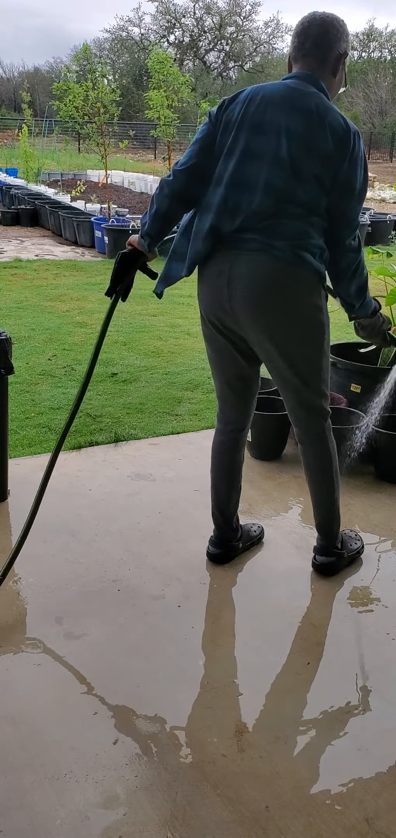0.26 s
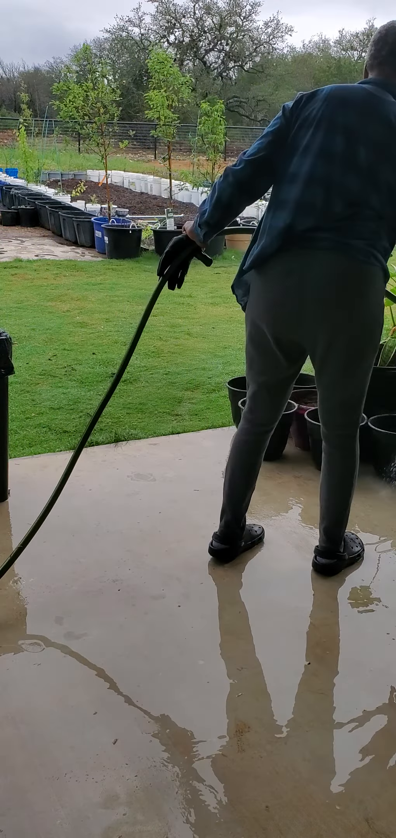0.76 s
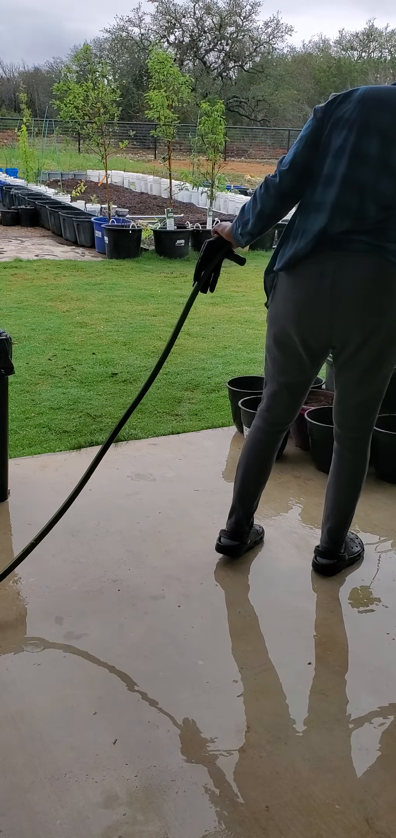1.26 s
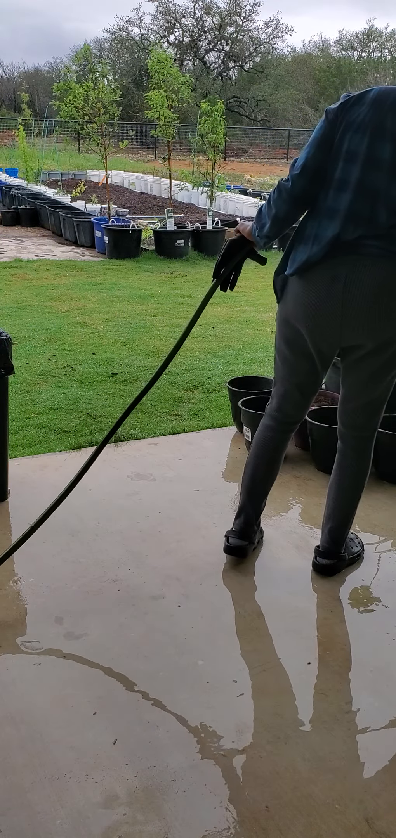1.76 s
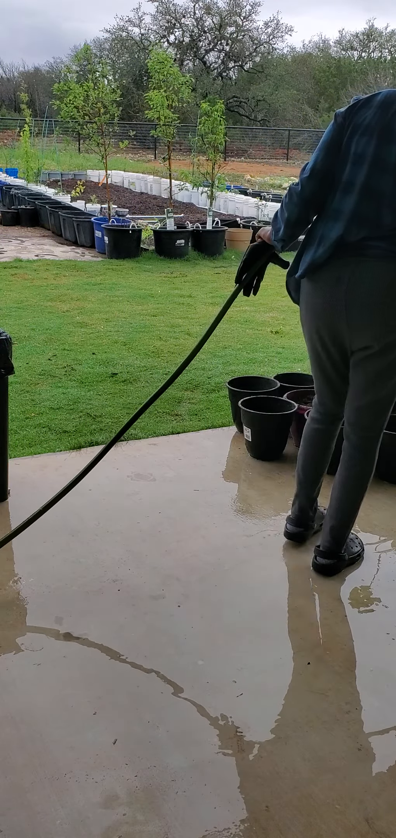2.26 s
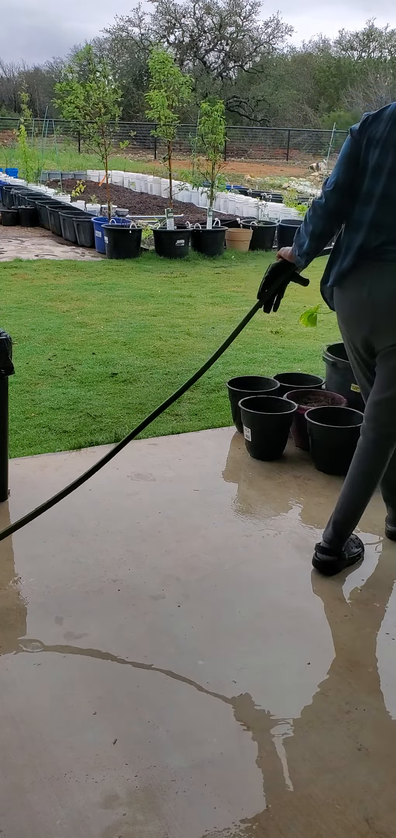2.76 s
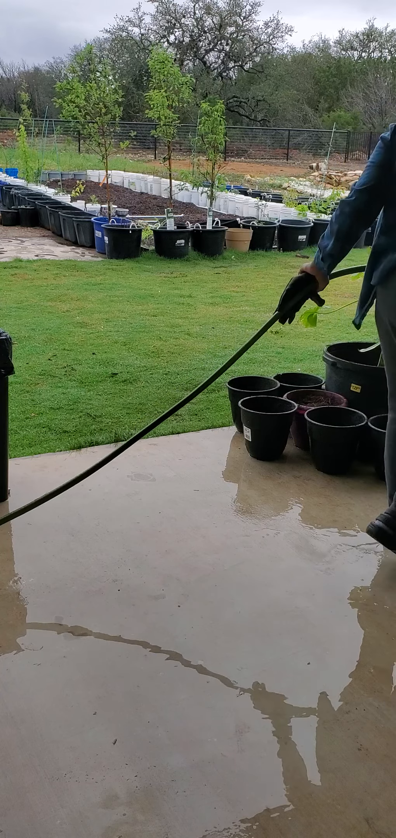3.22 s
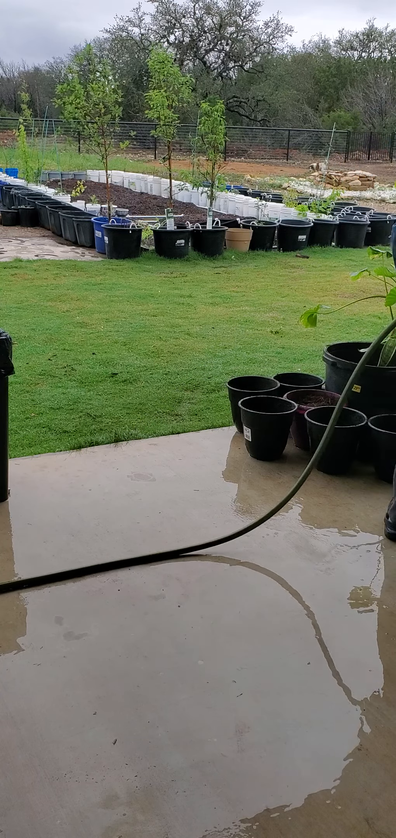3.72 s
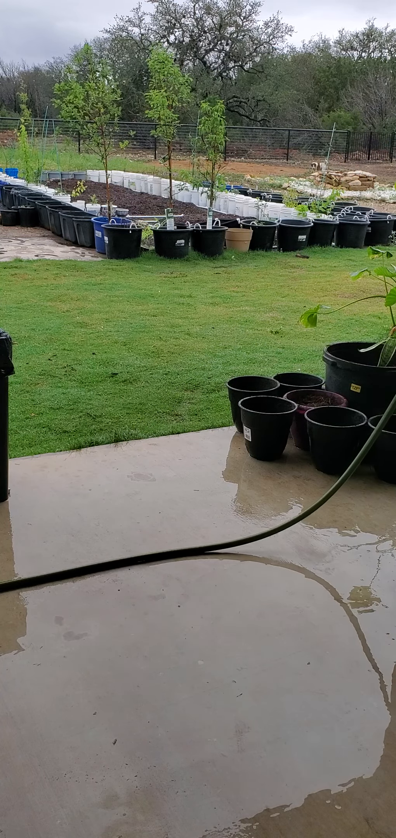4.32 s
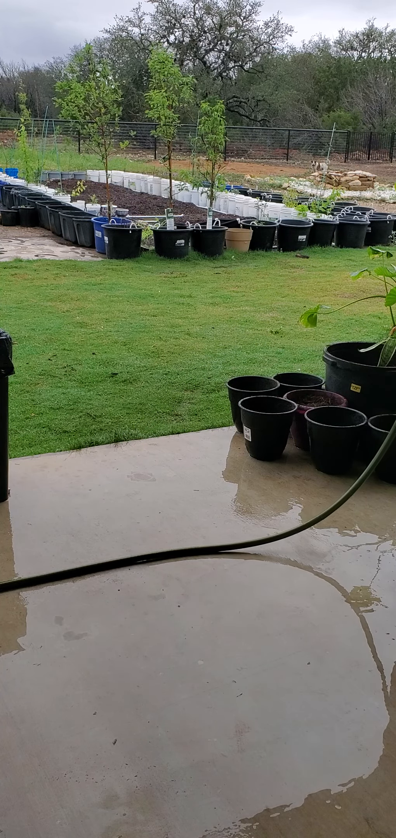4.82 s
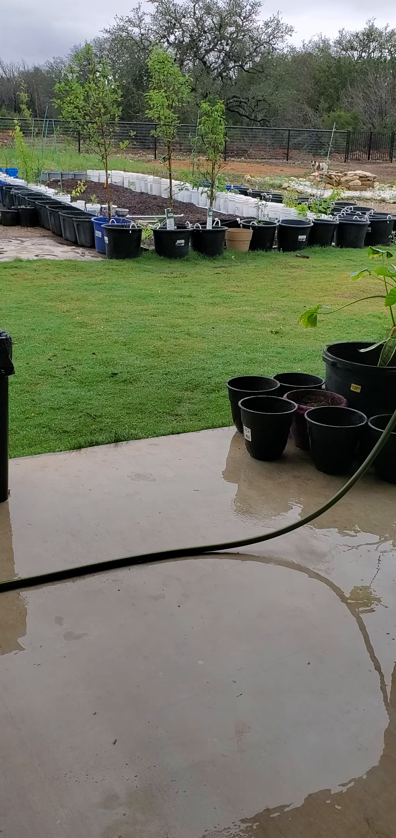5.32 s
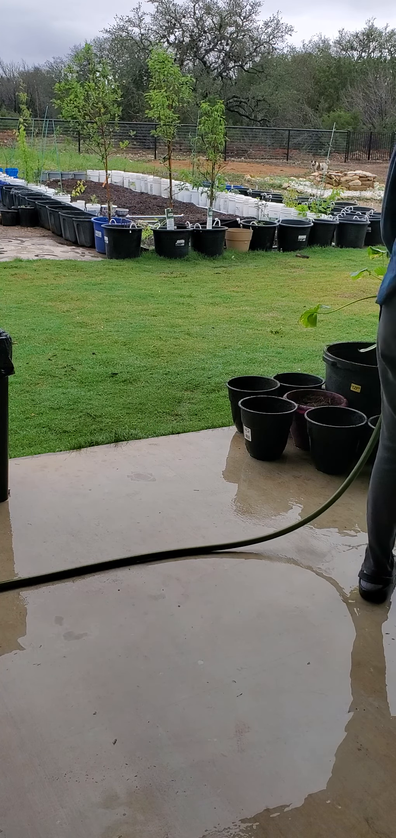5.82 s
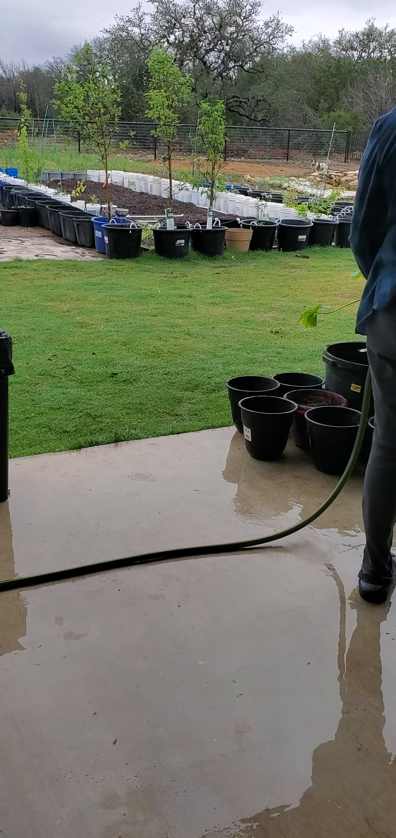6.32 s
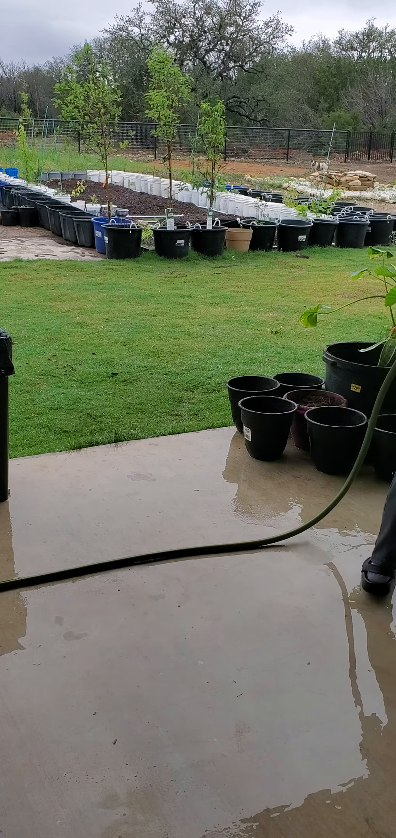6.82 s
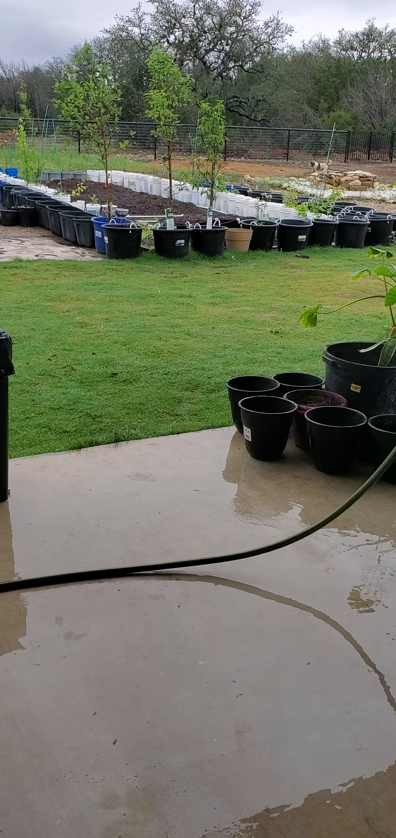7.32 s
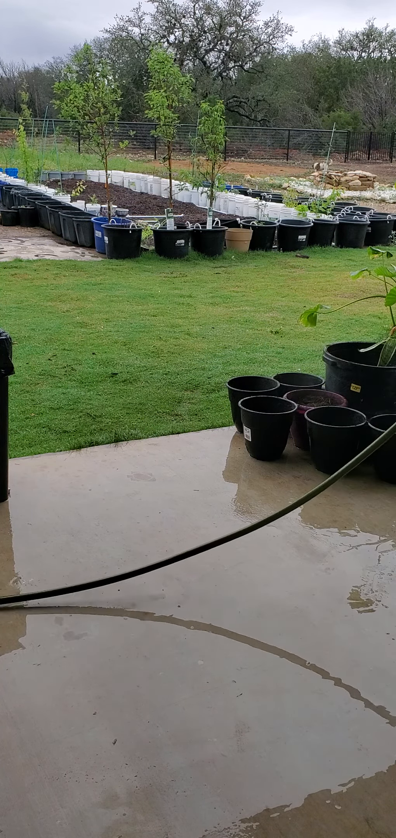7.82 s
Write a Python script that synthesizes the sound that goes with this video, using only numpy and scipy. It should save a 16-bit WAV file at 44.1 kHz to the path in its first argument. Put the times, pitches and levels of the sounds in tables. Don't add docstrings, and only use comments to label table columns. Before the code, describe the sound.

Outdoors on a wet concrete patio, a garden hose sprays close by with a bright, dense fizz and splashing. It patters across plastic pots, with brief hollow notes and clicking drops. Hard wet smacks land just before the middle, then the spray drops away to thin spits, a soft knock and gentle bursts on pots. Faint distant road rumble throughout; stereo phone microphone nearby.

```python
import sys
import numpy as np
from scipy import signal
from scipy.fft import rfft, irfft, next_fast_len
from scipy.io import wavfile
from scipy.ndimage import uniform_filter1d

SR = 44100
rng = np.random.default_rng(int(sys.argv[2]) if len(sys.argv) > 2 else 0)


def generate_wav(signal):
    frames = np.transpose(np.atleast_2d(signal))
    scaled = np.clip(frames, -1, 1) * 32767
    pcm = np.round(scaled).astype(np.int16)
    wavfile.write(sys.argv[1], SR, pcm)


def volts(x):
    e = np.asarray(x, float) / 20
    return 10 ** e


N = 355887
STEP = 44

# [t/s, fizz level on the slab/dB, splash level in pooled water/dB]
SPRAY = [(0, -33.5, -44), (.95, -32.5, -41.5), (1.35, -33, -42), (2.0, -36, -41.5), (2.45, -34.5, -43.5),
         (2.95, -32.5, -40), (3.25, -37, -42.5), (4.0, -39, -42.5), (4.22, -39, -46.5),
         (4.76, -41.5, -44.5), (5.02, -60.5, -53), (5.2, -64, -55.5), (5.6, -61, -58), (6.13, -52.5, -54.5),
         (6.42, -71, -58), (7.0, -61.5, -50.5), (7.7, -47, -49), (8.07, -57, -51)]
# [f/Hz, level per Hz/dB]
FIZZ_SPECTRUM = [(2500, -25), (5000, -9), (7000, 1), (9000, -4), (12000, 2.5), (15000, 3.5), (17000, 0)]
SPLASH_SPECTRUM = [(800, -33), (2000, -13.5), (3300, -3.5), (4500, -1.5), (6500, -1), (8500, -7.5),
                   (13000, -14)]
WALL_SPECTRUM = [(400, -13.5), (800, -10), (1300, -2), (1800, -2), (2500, -2), (3200, -4.5), (4500, -10.5),
                 (9000, -22)]
# [f/Hz, width/Hz, level/dB]
HOLLOW_MODES = [(260, 85, -14.5), (342, 55, -6.5), (470, 94, -2.5), (610, 90, -6), (875, 160, -17.5)]
# [arrival t/s, stay/s, change of fizz level/dB]
SHADES = [(.15, 0.16, -5.5), (.6, 0.068, -5), (1.05, 0.076, -9), (1.64, 0.039, -6), (2.2, 0.12, -6),
          (2.62, .1, -6), (4.4, 0.27, 3), (6.72, 0.12, 15), (7.55, .04, -7)]
# [arrival t/s, stay/s, level/dB]
SPITS = [(5.27, .01, -63), (5.38, .03, -55), (5.63, .01, -62), (5.7, .03, -56), (5.87, .02, -58),
         (5.97, .02, -57), (6.04, .03, -49), (6.2, 0.032, -53), (6.33, .01, -78), (7.46, .03, -50),
         (7.67, .04, -46.5), (7.79, 0.018, -57)]
# [arrival t/s, stay/s, level/dB]
PUDDLE = [(.11, 0.01, -35), (1.19, 0.063, -47), (.29, 0.05, -37), (1.7, 0.054, -39.5), (2.57, .2, -38.5),
          (2.81, 0.0075, -54), (3.47, 0.016, -39), (4.1, 0.058, -42.5), (4.42, 0.011, -46.5),
          (5.39, .02, -58), (5.62, 0.018, -60), (6.7, 0.14, -40.5)]
# [arrival t/s, stay/s, wall level/dB, hollow level over wall/dB]
POTS = [(.15, 0.03, -45, -27), (.26, 0.056, -43, -10), (.61, .06, -50, -12), (1.02, 0.17, -44, -10),
        (1.649, 0.05, -40.5, -13), (2.0, 0.029, -48, -26), (2.2, .18, -41, -12), (2.63, 0.067, -41, -15),
        (3.71, .11, -39, -5), (4.16, .02, -54, -12), (5.52, .02, -58.5, -4), (5.96, 0.1, -54.5, -9),
        (6.69, 0.23, -41, -6), (7.1, 0.27, -42.5, -10), (7.42, 0.22, -44, -12), (7.72, 0.26, -43, -17)]
# [arrival t/s, stay/s, level/dB]
DRUMS = [
    (3.765, .02, -37.5),
    (6.8, 0.034, -40.5),
]
# [t/s, level/dB]
ROAD = [(0, -49.5), (2.0, -53), (3.2, -52.5), (4.4, -52.5), (4.53, -48.5), (4.72, -53.5), (5.2, -53),
        (6.6, -53.5), (8.07, -52)]
# [t/s, f/Hz, level/dB]
DRONE = [(0.6, 78.8, -48), (0.712, 85, -62), (0.74, 85.3, -55), (1.394, 88, -49), (1.504, 85.3, -58),
         (1.566, 90.1, -50), (1.992, 88.2, -55), (2.0, 88.1, -53)]
# [f/Hz, level per Hz/dB]
RUMBLE_SPECTRUM = [(15, -46), (25, -48), (48, 0), (114, -3), (242, -13), (277, -10)]
AIR_SPECTRUM = [(242, -5.5), (277, -10), (641, -14), (818, -12.5), (1130, -19.5), (3430, -15), (7710, -48),
                (16000, -26)]
# [t/s, peak level/dB, 60 dB decay time/s, knock share level/dB]
SMACKS = [(0.101, -26, 0.15, -23), (0.879, -25, 0.11, -25), (2.807, -23, 0.078, -28),
          (3.91, -15.5, 0.36, -9), (3.932, -8, 0.06, -18), (3.944, -14.5, 0.17, -24),
          (4.018, -30, 0.07, -11), (5.612, -31.5, 0.33, -9.5)]
# [f/Hz, width/Hz, level/dB]
SMACK_MODES = [(1320, 440, 0), (2700, 900, -6), (3650, 1800, 0), (5830, 2300, -3), (10800, 9600, -16.5)]
# [middle t/s, length/s, f/Hz, width/Hz, level/dB]
RINGS = [(.281, .18, 2110, 600, -41.5), (.282, .3, 890, 277.8, -54), (0.884, .035, 5700, 1600, -36.5),
         (1.131, .28, 2530, 500, -53), (1.68, 0.27, 880, 324, -57), (1.704, .22, 2450, 700, -43.5),
         (1.721, 0.21, 3980, 700, -43), (2.301, 0.37, 2460, 400, -47), (2.615, .24, 5850, 600, -46),
         (2.682, 0.38, 3900, 700, -45.5), (3.301, .48, 6500, 500, -46.5), (3.751, .36, 1330, 220, -44),
         (3.773, 0.27, 1830, 220, -46), (5.63, 0.05, 3350, 900, -51), (5.7, 1.9, 3500, 800, -59),
         (6.79, .34, 2900, 550, -40), (6.799, .36, 400, 160, -45), (7.201, .48, 920, 324, -53),
         (7.202, 0.16, 1510, 100, -45), (7.681, .7, 930, 277.8, -54.5), (7.909, .2, 1470, 140, -48)]
# [t/s, peak level/dB, f/Hz]
DROPS = [(0.4858, -15, 14900), (0.5307, -14, 13700), (0.743, -15, 13100), (0.8275, -19, 9100),
         (2.5262, -17, 14600), (3.046, -18.5, 14500), (3.697, -18, 13300), (3.9335, -22, 8870),
         (4.41, -13, 14000), (4.4912, -22, 14600), (4.9127, -25, 14000), (5.2679, -39, 15500),
         (5.3487, -37, 15200), (5.3763, -35, 12400), (5.6151, -37, 15400), (5.6765, -29, 12600),
         (5.697, -35, 15100), (5.9723, -30, 14000), (6.0262, -39, 15500), (6.125, -27, 14300),
         (6.1589, -29, 12600), (6.2023, -33, 11600), (6.3275, -38, 14700), (6.558, -34, 12200),
         (6.8902, -31, 11600), (7.2764, -30, 12500), (7.4714, -33, 14900), (7.6111, -41, 14900),
         (7.676, -32, 14100), (7.7922, -23, 15000)]
# [left delay/ms, right delay/ms, gain]
ECHOES = [
    (.75, 0.893, 0.16),
    (1.3, 1.152, 0.23),
    (2.3, 2.6, 0.22),
]
# [t/s, factor on echo delays]
WALK = [(0, 0.93), (1.2, 1.08), (2.4, 1.04), (3.5, 0.91), (4.5, 0.6), (6.5, 1.07), (8.1, 1.06)]
# [f/Hz, shared share of the power]
LIKENESS = [(25, .75), (60, .87), (150, .95), (300, .88), (600, .33), (1500, .3), (4000, .33), (15000, .28)]
# [f/Hz, left minus right level/dB]
TILT = [(60, -1.5), (130, 0.5), (290, -1), (640, 0.5), (1410, 1.5), (3100, 1.5), (6820, 0), (15000, 2.5)]
# [f/Hz, level/dB]
PORT = [(6300, 2), (6900, 2.5), (7300, -4), (7550, -3), (7900, -2.5), (8500, 2.5), (9500, 6)]


def evened(x):
    return x / np.sqrt(np.mean(x ** 2) + 1e-20)


def read(points, hz):
    f, value = np.transpose(points)
    return np.interp(np.log(hz + 1), np.log(f + 1), value)


def curve(rows, count):
    rows = np.asarray(rows)
    return np.interp(np.arange(N) / SR, rows[:, 0], rows[:, count])


def colour(x, gain):
    size = next_fast_len(N)
    return irfft(rfft(x, size) * gain(np.fft.rfftfreq(size, 1 / SR)), size)[..., :N]


def spectrum(points):
    return lambda hz: volts(read(points, hz))


def peaks(modes):
    return lambda hz: np.sqrt(sum(volts(2 * db) / (1 + (2 * (hz - f) / w) ** 2) ** 2 for f, w, db in modes))


def patter(per_s, spread_db, ring_ms, bed):
    size = volts(2 * spread_db * np.minimum(rng.exponential(1, N), 4))
    hits = size * (rng.random(N) < per_s / SR)
    power = signal.lfilter([1], [1, -np.exp(-1000 / (ring_ms * SR))], hits)
    return rng.standard_normal((2, N)) * np.sqrt(abs(bed) + power / power.mean())


def stays(rows, slopes):
    knee_db, beyond = 12, 1.7
    t, rows = np.arange(N // STEP + 2) * STEP / SR, np.asarray(rows)
    start = rows[:, :1]
    end = start + abs(rows[:, 1:2])
    under = slopes[0] * np.maximum(start - t, 0) + slopes[1] * np.maximum(t - end, 0)
    return -under - beyond * np.maximum(under - knee_db, 0)


def at_samples(coarse):
    return np.interp(np.arange(N) / STEP, np.arange(len(coarse)), coarse)


def visits(rows, slopes, top_db=None):
    if top_db is None:
        top_db = np.transpose(rows)[2]
    return at_samples(volts(2 * (stays(rows, slopes) + top_db[:, None])).sum(0))


def part(x, gain, power):
    return evened(colour(x, gain)) * np.sqrt(power)


def fizz():
    shade_db = np.transpose(SHADES)[2] @ volts(stays(SHADES, (130, 85)))
    slab_db = curve(SPRAY, count=1) + at_samples(shade_db)
    power = volts(2 * slab_db) + visits(SPITS, (460, 620))
    return part(patter(900, 2.5, 0.23, 2.3), spectrum(FIZZ_SPECTRUM), power)


def splash():
    power = volts(2 * curve(SPRAY, count=2)) + visits(PUDDLE, (110, 104))
    return part(patter(600, 3.9, 0.34, 2.05), spectrum(SPLASH_SPECTRUM), power)


def walls():
    pool_db = curve(SPRAY, count=2)
    stray_db = -51.5 + 0.63 * (pool_db - pool_db[0]) - 1.37 * np.arange(N) / SR
    power = volts(2 * stray_db) + visits(POTS, (85, 72))
    return part(patter(400, 0.83, 0.52, 9.3), spectrum(WALL_SPECTRUM), power)


def hollow():
    pots = np.transpose(POTS)
    power = volts(2 * -63.5) + visits(POTS, (99, 91), pots[2] + pots[3]) + visits(DRUMS, (56, 65))
    return part(patter(250, 3.2, 6.2, 1.7), peaks(HOLLOW_MODES), power)


def patchy(x, patch_db, flutter_db):
    z = signal.stft(x, nperseg=256)[2]
    field = rng.standard_normal(z.shape[1:])
    patches = evened(uniform_filter1d(uniform_filter1d(field, size=5, axis=0), size=14, axis=1))
    flutter = evened(uniform_filter1d(rng.standard_normal(z.shape[2]), size=9))
    return signal.istft(z * volts(patch_db * patches + flutter_db * flutter), nperseg=256)[1][:, :N]


def spray():
    return patchy(fizz() + splash() + walls() + hollow(), patch_db=1.0, flutter_db=0.5)


def yard(split_hz=230, air_db=-56):
    noise = rng.standard_normal((2, 2, N))
    low = lambda hz: 1 / np.sqrt(1 + (hz / split_hz) ** 6)
    rumble = evened(colour(noise[0], lambda hz: volts(read(RUMBLE_SPECTRUM, hz)) * low(hz)))
    rumble = rumble * volts(curve(ROAD, count=1))
    air = evened(colour(noise[1], lambda hz: volts(read(AIR_SPECTRUM, hz)) * np.sqrt(1 - low(hz) ** 2)))
    t = np.arange(N) / SR
    fade = np.clip(np.minimum(t - DRONE[0][0], DRONE[-1][0] - t) / 0.16, 0, 1)
    phase = 2 * np.pi * np.cumsum(curve(DRONE, count=1)) / SR
    drone = np.sqrt(2) * np.sin(phase) * volts(curve(DRONE, count=2))
    rumble[0] += drone * fade
    return rumble + volts(air_db) * air


def smacks(rise_ms=1.3):
    t, level = np.arange(N) / SR, np.zeros((2, N))
    for s, db, t60, knock_db in SMACKS:
        age = np.maximum(t - s, 0)
        shape = volts(db - 13.5 - 60 * age / t60) * np.minimum(age * 1000 / rise_ms, 1)
        level += shape * volts([[0], [knock_db]])
    burst = patter(900, 1.1, 0.87, 0.9)
    wet = evened(colour(burst, peaks(SMACK_MODES[1:])))
    knock = evened(colour(burst, peaks(SMACK_MODES[:1])))
    return wet * level[0] + knock * level[1]


def rings():
    out, size = np.zeros((2, N)), 65536
    drive = rfft(patter(210, 3.0, 0.87, 2.2)[:, :size])
    for s, length_s, hz, width, db in RINGS:
        count = round(length_s * SR)
        band = irfft(drive * peaks([(hz, width, 0)])(np.fft.rfftfreq(size, 1 / SR)))
        band = np.roll(np.tile(band, 2), rng.integers(size), axis=1)[:, :count]
        start = round((s - length_s / 2) * SR)
        out[:, start:][:, :count] += volts(db) * evened(band) * np.hanning(count)
    return out


def drops(tick_ms=1.0, spatter_ms=9, spatter_db=-13, tone_db=-4):
    count = 2000
    out, t_ms = np.zeros((2, N + count)), np.arange(count) / SR * 1000
    noise = rng.standard_normal((len(DROPS), 2, count))
    for (s, db, hz), n in zip(DROPS, noise):
        ring = volts(tone_db) * np.sin(2 * np.pi * hz * t_ms / 1000)
        tick = (ring + 0.19 * n) * np.exp(-t_ms / tick_ms)
        spatter = volts(spatter_db) * n * np.exp(-t_ms / spatter_ms)
        out[:, round(s * SR):][:, :count] += volts(db - 2) * (tick + spatter)
    return colour(out[:, :N], lambda hz: 1 / np.sqrt(1 + (9000 / (hz + 1)) ** 6))


def echoed(x):
    lag_ms = 0.038
    hz, t, z = signal.stft(x, SR, nperseg=1024)
    turns = -2j * np.pi * np.outer(hz, np.interp(t, *np.transpose(WALK))) / 1000
    paths = [1 + sum(e[2] * np.exp(turns * e[side]) for e in ECHOES) for side in (0, 1)]
    paths[0] = paths[0] * np.exp(-2j * np.pi * hz * lag_ms / 1000)[:, None]
    power = 1 + sum(e[2] ** 2 for e in ECHOES)
    return signal.istft(z * paths / np.sqrt(power), SR, nperseg=1024)[1][:, :N]


def scattered(x):
    z = signal.stft(x, window="cosine", nperseg=512)[2]
    z = z * np.exp(2j * np.pi * rng.random(z.shape))
    y = signal.istft(z, window="cosine", nperseg=512)[1][:N]
    return evened(y) * np.std(x)


def scene():
    water, far, hits = spray() + rings(), yard(), drops() + smacks()
    a, b = water + hits
    same = lambda hz: np.clip(read(LIKENESS, hz), 0, 1)
    shared = echoed((a + b) / np.sqrt(2)) + far[0]
    left = (a - b) / np.sqrt(2) + far[1]
    right = scattered(water[1]) + np.roll(hits[1], 40) + np.roll(far[1], 9001)
    apart = np.array([left, right])
    both = colour(shared, lambda hz: np.sqrt(same(hz))) + colour(apart, lambda hz: np.sqrt(1 - same(hz)))
    return colour(both, lambda hz: volts(np.outer([.5, -.5], read(TILT, hz))))


def roll_off(x):
    return signal.sosfilt(signal.butter(12, 17060, fs=SR, output="sos"), x)


def record(dry):
    heard = colour(dry, lambda hz: volts(read(PORT, hz)) * (hz < 15950))
    return roll_off(heard)


dry = scene()
out = record(dry)
generate_wav(out)
```